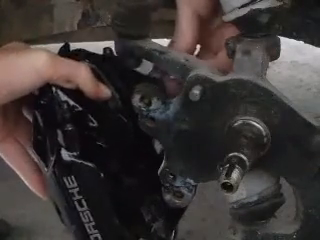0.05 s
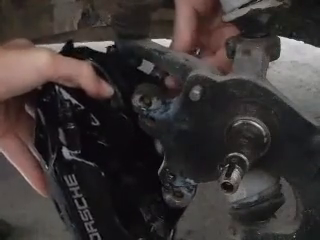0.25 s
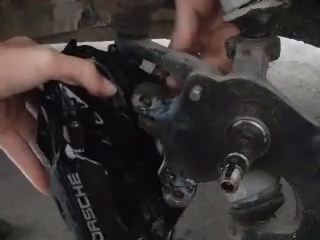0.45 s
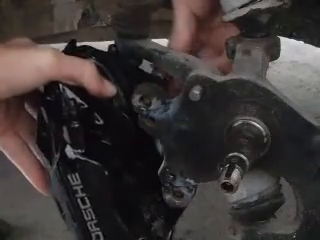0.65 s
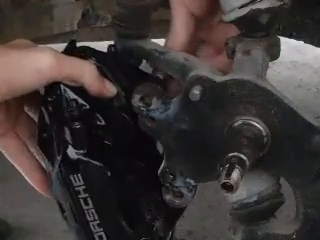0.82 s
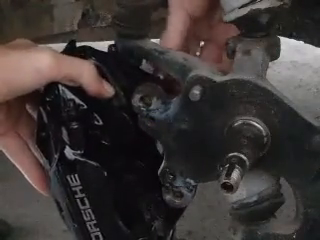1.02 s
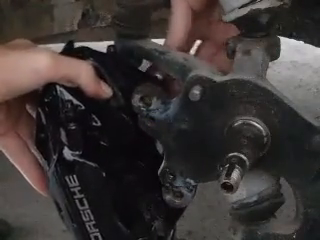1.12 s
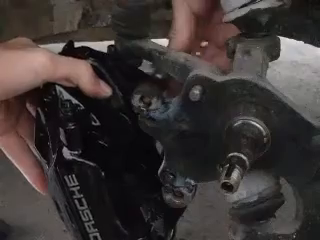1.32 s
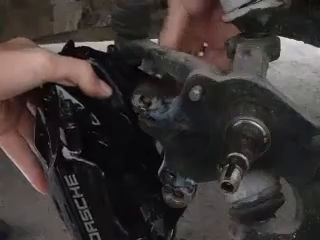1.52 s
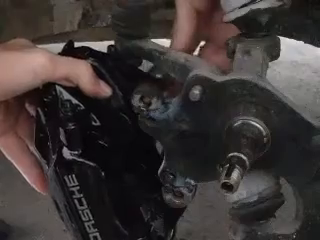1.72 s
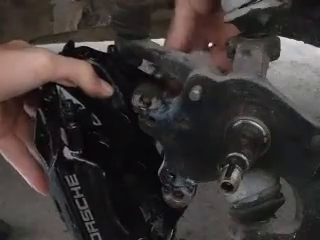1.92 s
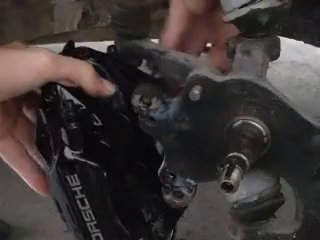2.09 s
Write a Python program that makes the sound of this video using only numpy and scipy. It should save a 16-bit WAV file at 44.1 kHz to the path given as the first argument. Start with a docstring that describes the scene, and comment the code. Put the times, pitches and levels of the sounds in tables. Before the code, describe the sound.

Close phone pickup of a brake part eased onto a steel carrier: an early bright clank, a small tick, dull bumps, faint scrapes, then crisp clicks past the middle, over low room rumble and soft hiss.

```python
"""In a workshop, close to a phone, a heavy brake caliper is eased against the steel tabs of a wheel carrier.
One firm knock with fast bounces rings the casting as a set of decaying modes under noise; light ticks are a
click and two short rings, scrapes are swells of tiny impacts, soft thumps are swells of low filtered noise.
The room answers with a decaying noise tail. Banded noise makes the air and low rumble, a narrow noise band
the hiss up high, and a wavering sine the faint far whine that sets in late."""
import sys
import numpy as np
from scipy import signal
from scipy.fft import rfft, irfft
from scipy.io import wavfile
from scipy.ndimage import uniform_filter1d

SR = 44100
rng = np.random.default_rng(int(sys.argv[2]) if len(sys.argv) > 2 else 0)


def output_pcm(signal):
    """Save a mono or channel-first signal as 16-bit PCM at the path in sys.argv[1].

    Samples are clipped to [-1, 1] before scaling.
    """
    pcm = np.clip(np.atleast_2d(signal).T, -1, 1) * 32767
    wavfile.write(sys.argv[1], SR, np.round(pcm).astype(np.int16))


N = 94815


def undb(db):
    """Decibels to gain."""
    return 10 ** (np.asarray(db) / 20)


def level(x, db):
    """Scale to an RMS level in dB."""
    return x * undb(db) / np.sqrt(np.mean(x ** 2))


def band(x, hz, width_hz):
    """One resonance, gain 1 at its centre."""
    return signal.lfilter(*signal.iirpeak(hz, hz / width_hz, SR), x)


def fade(t, t60):
    """Exponential decay that falls 60 dB in t60 seconds."""
    return np.exp(-np.log(1000) * t / t60)


def colour(table, size):
    """Gain for each bin of a spectrum from (Hz, dB) points, joined along log frequency."""
    hz, db = np.array(table).T
    freq = np.fft.rfftfreq(size, 1 / SR) + 1
    return undb(np.interp(np.log(freq), np.log(hz), db, left=-60))


def coloured_noise(table, size):
    """Noise shaped by a table of spectrum points."""
    return irfft(rfft(rng.standard_normal(size)) * colour(table, size), size)


def ring(t, hz, t60, spread, rise_cycles, count):
    """A cluster of close partials around the pitch that builds over a few cycles and dies away."""
    place = np.arange(count) - (count - 1) / 2 + 0.2 * rng.standard_normal(count)
    detune = spread * 2 * place[:, None] / count
    partials = np.sin(2 * np.pi * hz * (1 + detune) * t)
    shape = fade(t, t60) * (1 - fade(t, rise_cycles / hz))
    return partials.sum(axis=0) / np.sqrt(count) * shape


def add(out, x, start_s):
    """Mix a sound in at its start, cut at the end of the scene."""
    i = int(start_s * SR)
    out[i:i + len(x)] += x[:N - i]


def walk(rate):
    """Random levels held 1 / rate s and slewed twice."""
    hold = int(SR / rate)
    steps = np.repeat(rng.standard_normal(N // hold + 1), hold)
    return 1.25 * uniform_filter1d(uniform_filter1d(steps, hold), hold)[:N]


def swells(table, source):
    """A bell-shaped swell of the source in each row's band, at the row's level in its middle."""
    t, out = np.arange(N) / SR, 0
    for middle_s, length_s, db, hz, width_hz in table:
        bell = np.exp(-.5 * ((t - middle_s) / (0.5 * length_s)) ** 2)
        swell = band(band(source(), hz, width_hz), hz, 2 * width_hz) * bell
        out = out + undb(db) * swell / np.sqrt(np.sum(swell ** 2) / np.sum(bell ** 2))
    return out


# Spectrum of the air and its low rumble. Each row: frequency in Hz, relative density in dB per Hz.
AIR_SPECTRUM = [(13, -40), (45, -3), (102, -2.5), (200, -6.5), (390, -7), (826, -10), (1200, -13),
                (2120, -17), (3500, -19.5), (6000, -21.5), (9000, -24), (11000, -22), (14000, -26.5)]
AIR_DB, LEFT_AIR_DB = -50, .9  # the left is up by the second figure, the right down by it
AIR_ALIKE_HZ, STEADY_ABOVE_HZ = 120, 7500
SWELL_DB, FLICKER_DB = .3, .8  # depths in the lowest bass; they shrink towards the treble


def air():
    """Half-octave bands that swell together and flicker alone; only the bass is alike left and right."""
    out, swell = 0, walk(1.4)
    freq = np.fft.rfftfreq(N, 1 / SR) + 1
    spectrum = colour(AIR_SPECTRUM, N)
    for hz in 25 * 2 ** np.arange(0, 9.6, .5):
        share = np.cos(np.pi / 2 * np.clip(2 * np.log2(freq / hz), -1, 1))
        mid, side = irfft(rfft(rng.standard_normal((2, N))) * spectrum * share, N)
        alike = 0.58 / (1 + hz / AIR_ALIKE_HZ) - .08
        both = np.sqrt(1 + alike) * mid + np.sqrt(1 - alike) * side * np.array([[1], [-1]])
        motion_db = (SWELL_DB * swell + FLICKER_DB * walk(8.62)) / (1 + hz / STEADY_ABOVE_HZ)
        out = out + undb(motion_db) * both
    return level(out, AIR_DB) * undb([[LEFT_AIR_DB], [-LEFT_AIR_DB]])


HISS_BAND_HZ, HISS_BAND_DB, HISS_WIDTH_HZ = 8000, -68, 100


def hiss():
    """Noise through one narrow resonance: a steady hiss high up, separate left and right."""
    return level(band(rng.standard_normal((2, N)), HISS_BAND_HZ, HISS_WIDTH_HZ), HISS_BAND_DB)


GRAINS_PER_S, GRAIN_SCATTER_DB = 4000, 3.5


def grains():
    """Dense tiny impacts of rough metal, at random times, signs and levels."""
    chance, sign, size = rng.random((3, N))
    loudness = undb(-GRAIN_SCATTER_DB * np.log(np.maximum(size, .15)))
    return (chance < GRAINS_PER_S / SR) * np.sign(sign - .5) * loudness


# Scrapes of metal on metal. Each row: middle in seconds, length in seconds, level in dB,
# centre in Hz, width in Hz of the narrower of two resonances.
SCRAPE_SWELLS = [(.002, 0.068, -50.5, 3960, 4970), (1.42, 0.04, -57, 4470, 6000),
                 (.915, 0.068, -57.5, 8240, 9000), (.921, 0.019, -51, 3200, 3020),
                 (1.115, 0.016, -55.5, 2500, 4000), (1.21, 0.024, -54, 1980, 1200),
                 (1.4035, 0.0043, -50.5, 11500, 3000), (1.432, 0.03, -49, 1210, 1980)]


def scrapes():
    """Rough metal sliding: grains that swell and sink in a band."""
    return swells(SCRAPE_SWELLS, grains)


ROOM_DB = -11  # before the dulling low-pass
ROOM_T60_S, ROOM_TREBLE_T60_S, ROOM_SPLIT_HZ, ROOM_DULL_HZ = 0.83, 0.19, 1030, 7340
ROOM_BUILD_S, ROOM_ALIKE = 0.021, 0.57  # time to full density; share of power common to both sides


def room(x):
    """A decaying noise tail, treble dying first, partly alike left and right."""
    t = np.arange(SR) / SR
    noise = rng.standard_normal((3, SR))
    noise = np.sqrt(ROOM_ALIKE) * noise[0] + np.sqrt(1 - ROOM_ALIKE) * noise[1:]
    low = signal.lfilter(*signal.butter(1, ROOM_SPLIT_HZ, fs=SR), noise)
    tail = low * fade(t, ROOM_T60_S) + (noise - low) * fade(t, ROOM_TREBLE_T60_S)
    tail = tail * (1 - fade(t, ROOM_BUILD_S))
    tail = tail * undb(ROOM_DB) / np.sqrt(np.sum(tail ** 2) / 2)
    tail = signal.lfilter(*signal.butter(1, ROOM_DULL_HZ, fs=SR), tail)
    return signal.fftconvolve(x[None], tail, axes=1)[:, :N]


# Light ticks of the tabs. Each row: start in seconds, level in dB, first ring in Hz, second ring in Hz,
# second ring in dB against the first, contact click in dB before its fade and the row's level.
TAB_TICKS = [(.032, -46.5, 1700, 10500, 2.5, -8), (.3463, -36, 2014, 6150, 0, 1.5),
             (.3545, -40, 1950, 5100, -4, -6), (1.1956, -41.5, 2000, 10400, -14, 1),
             (1.2191, -46, 1900, 3300, -18, -15), (1.4273, -57, 1540, 2300, 10, -13),
             (1.4417, -31, 10340, 7800, -9, -10), (1.4417, -43.5, 5040, 4020, -6, -14),
             (1.4448, -42, 10370, 4780, -9, -3), (1.5756, -37.5, 2605, 2190, -8, -16),
             (2.0956, -48, 2330, 10000, -3, -11)]
TICK_T60_CYCLES, TICK_T60_MIN_S, TICK_RISE_CYCLES = 64, 0.008, 18.3
TICK_SPREAD = 0.03  # share of the pitch over which the close partials scatter
TICK_CLICK_T60_S = 0.013


def tick_ring(t, hz):
    """A short ring; the higher it is, the sooner it is gone."""
    return ring(t, hz, TICK_T60_MIN_S + TICK_T60_CYCLES / hz, TICK_SPREAD, TICK_RISE_CYCLES, count=3)


def ticks():
    """A noise click of contact with two short rings of the steel."""
    out, t = np.zeros(N), np.arange(SR // 10) / SR
    for start_s, db, first_hz, second_hz, second_db, click_db in TAB_TICKS:
        click = level(band(rng.standard_normal(len(t)), 6600, 15500), click_db) * fade(t, TICK_CLICK_T60_S)
        rings = tick_ring(t, first_hz) + undb(second_db) * tick_ring(t, second_hz)
        add(out, undb(db) * (rings + click), start_s)
    return out


# Soft thumps of the heavy part in the hands. Each row: middle in seconds, length in seconds, level in dB,
# centre in Hz, width in Hz of the narrower of two resonances.
HAND_THUMPS = [(.15, 0.095, -59, 193, 50), (.38, 0.056, -57, 190, 60), (.475, 0.038, -53.5, 336, 90),
               (.49, 0.04, -52.5, 202, 73), (.525, 0.026, -59, 319, 120), (.925, 0.02, -53, 308, 92),
               (.955, 0.013, -55, 840, 200), (.99, 0.062, -57, 432, 200), (1.22, 0.031, -54, 212, 100),
               (1.26, 0.054, -57.5, 570, 505), (1.31, 0.12, -56, 106, 49.7)]


def thumps():
    """Dull contact of a heavy part: noise that swells and sinks in a mostly low band."""
    return swells(HAND_THUMPS, lambda: rng.standard_normal(N))


# Modes of the knocked casting. Each row: frequency in Hz, level in dB against the blow, t60 in seconds.
CASTING_MODES = [(522, -17, 0.13), (824, -16.5, .2), (921, -15, 0.11), (1112, -14, 0.086),
                 (1578, -5.5, 0.11), (2103, -7, 0.042), (2720, -2.5, 0.022), (2970, -5, 0.019),
                 (3200, -8, 0.044), (3330, -1.5, 0.026), (3512, -4.5, 0.053), (3690, -9, 0.05),
                 (4297, -8, 0.039), (4500, -13, .07), (4820, -7, 0.047), (5150, -0.5, 0.039),
                 (5230, -21.5, 0.45), (5200, -10, 0.023), (5380, -6, 0.048), (5270, -7, 0.03),
                 (10346, 4, 0.018), (11170, -3.5, 0.0079), (13050, -2, 0.0067)]
# The knock and its bounces. Each row: start in seconds, level in dB.
KNOCK_BLOWS = [(.2374, -26.5), (.2392, -28.5), (.2422, -33), (0.246, -45)]
# The many small modes that ring on after the knock. Each row: frequency in Hz, relative density in dB per Hz.
WASH_SPECTRUM = [(210, -42), (350, -8), (535, 1), (950, -2), (1060, -3.5), (1880, -9.5), (5250, -6),
                 (6200, -17.5), (13000, -13)]
WASH_DB, WASH_T60_S = -16.5, 0.7  # level against the blow, before the fade
CRACK_DB, CRACK_T60_S, CRACK_HZ, CRACK_WIDTH_HZ = 0, 0.025, 3300, 4200  # level likewise
MODE_SCATTER, KNOCK_RISE_CYCLES = 0.004, 7  # the first sets each mode's random detune, as a share of pitch
BOUNCE_THIN_HZ = 1500  # a bounce is too light to ring the modes below this


def knock():
    """Each blow rings the casting's modes under a short crack and a wash of small modes."""
    out, t = np.zeros(N), np.arange(SR // 2) / SR
    thin = signal.butter(2, BOUNCE_THIN_HZ, "high", fs=SR)
    for blow, (start_s, db) in enumerate(KNOCK_BLOWS):
        body = np.zeros(len(t))
        for k, (hz, mode_db, t60) in enumerate(CASTING_MODES):
            mode = ring(t, hz, t60, MODE_SCATTER, KNOCK_RISE_CYCLES, count=1)
            body += (-1) ** k * undb(mode_db) * mode  # successive rows start in opposite phase
        if blow > 0:
            body = signal.lfilter(*thin, body)
        crack = band(rng.standard_normal(len(t)), CRACK_HZ, CRACK_WIDTH_HZ)
        crack = level(band(crack, CRACK_HZ, CRACK_WIDTH_HZ), CRACK_DB) * fade(t, CRACK_T60_S)
        wash = level(coloured_noise(WASH_SPECTRUM, len(t)), WASH_DB) * fade(t, WASH_T60_S)
        add(out, undb(db) * (body + crack + wash), start_s)
    return out


# A far whine that comes and goes. Each row: time in seconds, pitch in Hz, level in dB.
FAR_WHINE = [(1.575, 1020, -76), (1.6, 1025, -60), (1.635, 1030, -67), (1.665, 1025, -59),
             (1.72, 1030, -64), (1.76, 965, -59), (1.81, 995, -61), (1.86, 995, -70), (2.0, 985, -69)]
WHINE_WAVER = .008  # share of the pitch


def whine():
    """A sine that sets in late, slipping and wavering in pitch while its level rises and falls."""
    t = np.arange(N) / SR
    time_s, hz, db = np.array(FAR_WHINE).T
    pitch = np.interp(t, time_s, hz) * (1 + WHINE_WAVER * walk(40))
    tone = np.sqrt(2) * np.sin(2 * np.pi * np.cumsum(pitch) / SR)
    return tone * undb(np.interp(t, time_s, db)) * (t > time_s[0])


LEFT_LAG_S = 2e-5  # the direct sound reaches the left this much later
TREBLE_TILT_DB, TREBLE_TILT_HZ = 2.5, 9500  # approximate left-over-right lift at the centre


def scene():
    """Contact sounds, direct and through the room, over the air, hiss and whine."""
    near = scrapes() + ticks() + thumps() + knock()
    lag = np.exp(-2j * np.pi * np.fft.rfftfreq(N, 1 / SR) * LEFT_LAG_S)
    late = irfft(rfft(near) * lag, N)
    left, right = np.array([late, near]) + room(near) + air() + hiss() + whine()
    lift = undb(TREBLE_TILT_DB / 2) - 1
    left = left + lift * band(left, TREBLE_TILT_HZ, TREBLE_TILT_HZ / 2)
    right = right - lift * band(right, TREBLE_TILT_HZ, TREBLE_TILT_HZ / 2)
    return np.array([left, right])


TOP_HZ = 14200


def record(dry):
    """The phone cuts the top: a steep low-pass."""
    return signal.sosfilt(signal.ellip(10, .2, 70, TOP_HZ, fs=SR, output="sos"), dry)


dry = scene()
out = record(dry)
output_pcm(out)
```